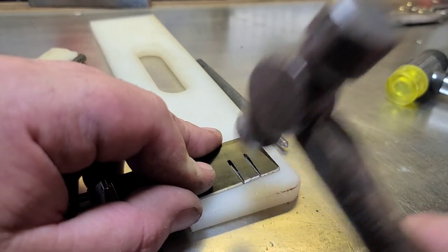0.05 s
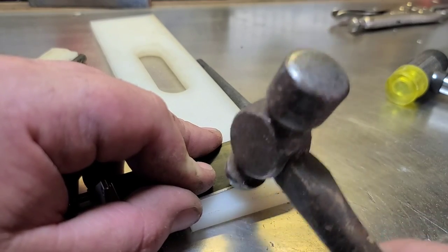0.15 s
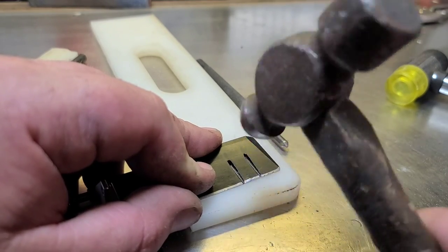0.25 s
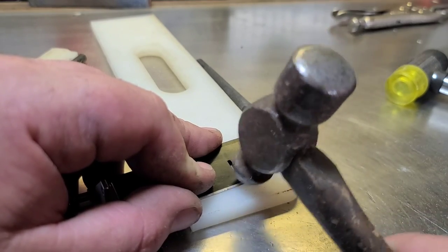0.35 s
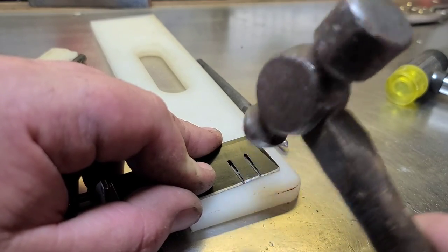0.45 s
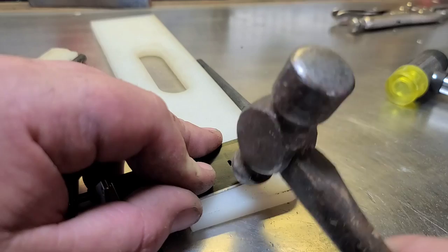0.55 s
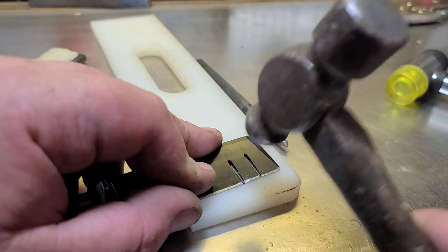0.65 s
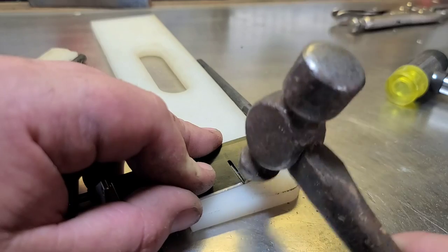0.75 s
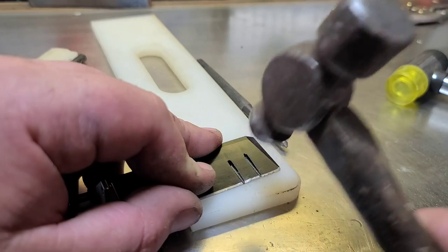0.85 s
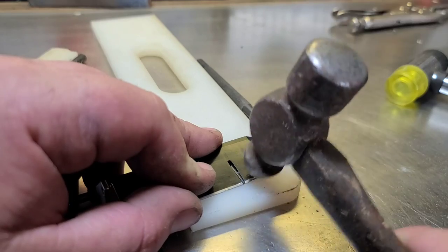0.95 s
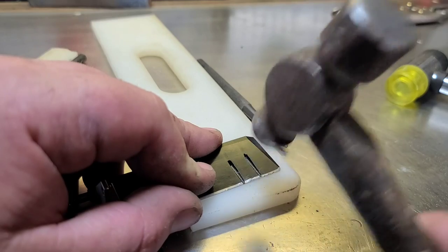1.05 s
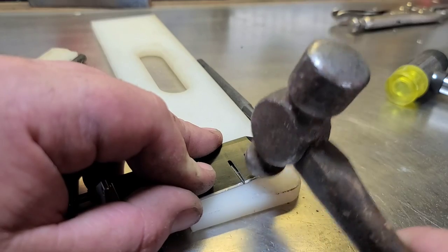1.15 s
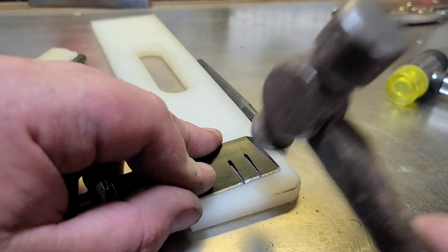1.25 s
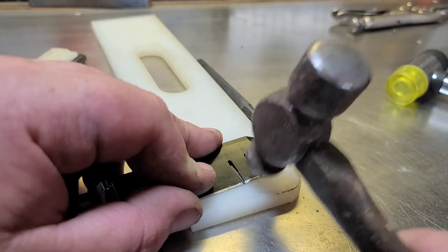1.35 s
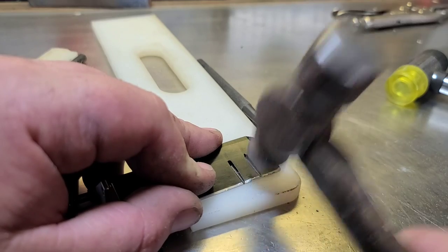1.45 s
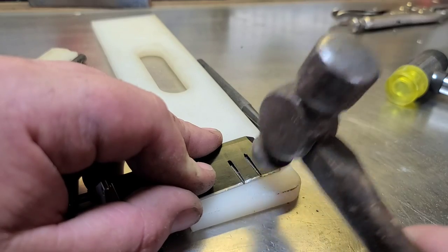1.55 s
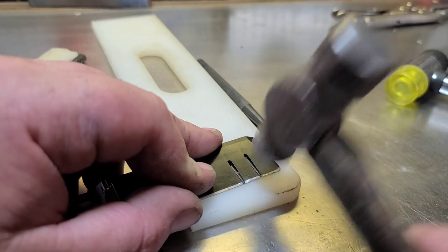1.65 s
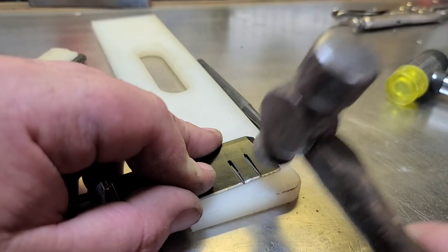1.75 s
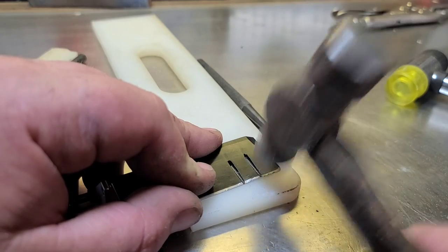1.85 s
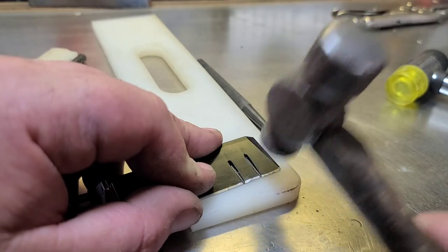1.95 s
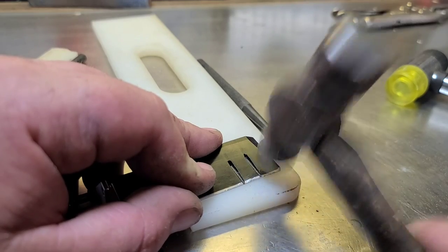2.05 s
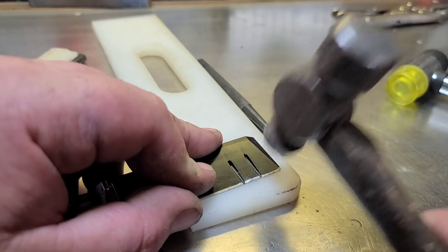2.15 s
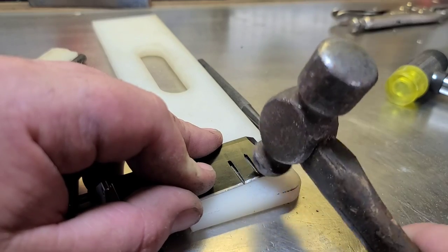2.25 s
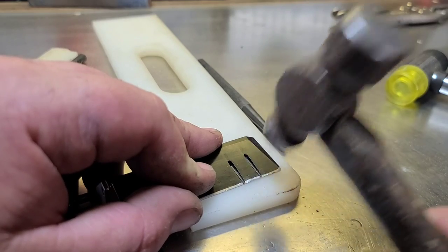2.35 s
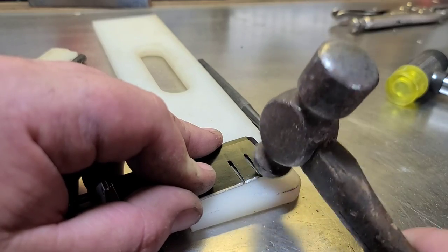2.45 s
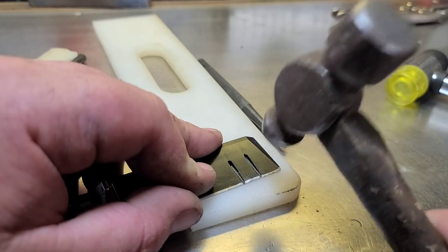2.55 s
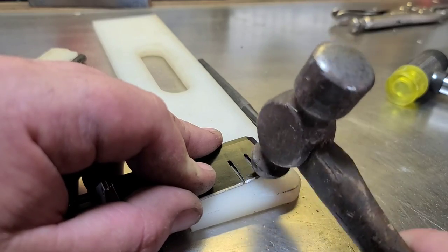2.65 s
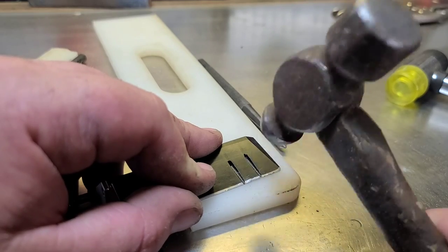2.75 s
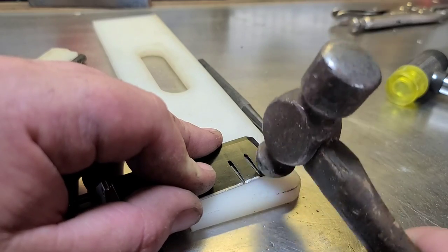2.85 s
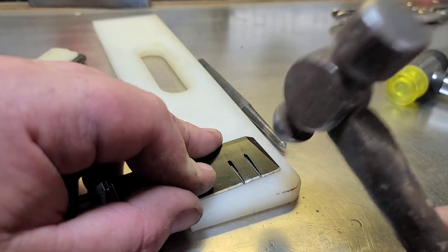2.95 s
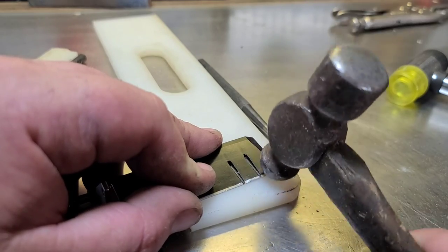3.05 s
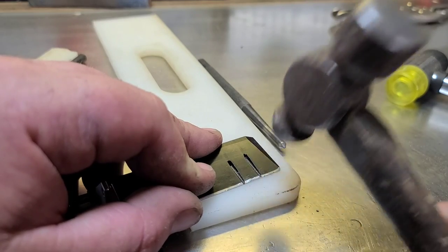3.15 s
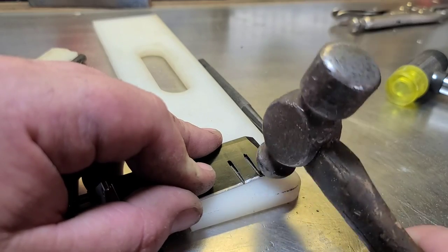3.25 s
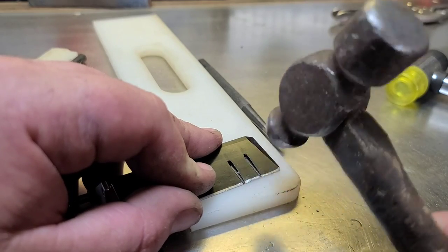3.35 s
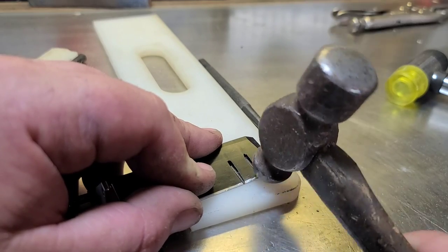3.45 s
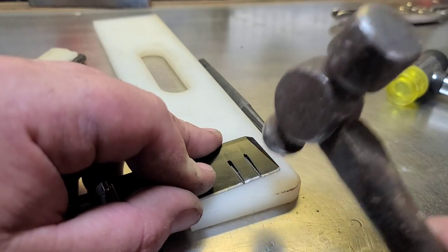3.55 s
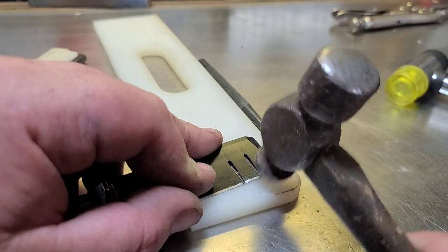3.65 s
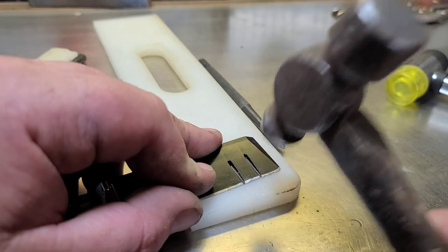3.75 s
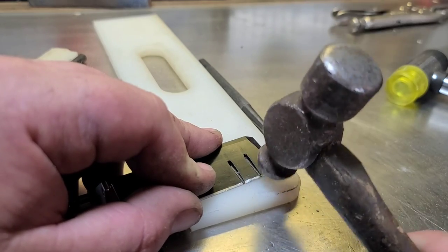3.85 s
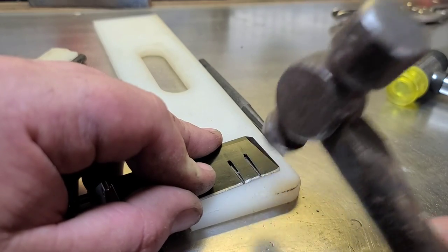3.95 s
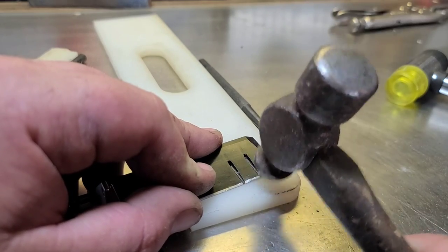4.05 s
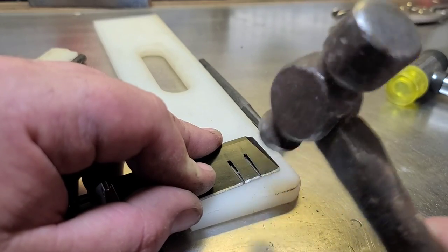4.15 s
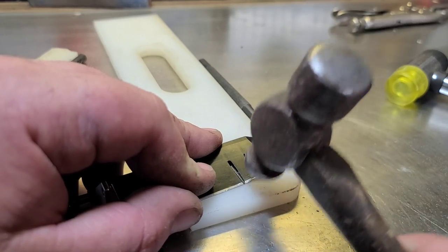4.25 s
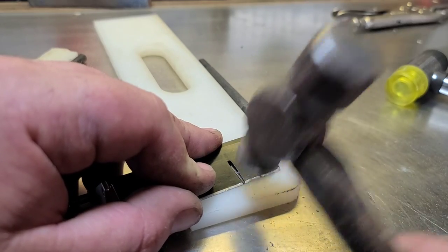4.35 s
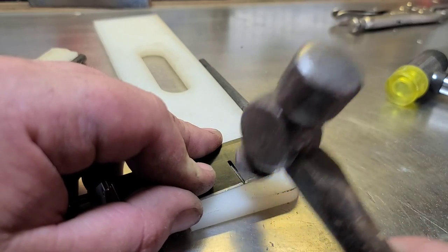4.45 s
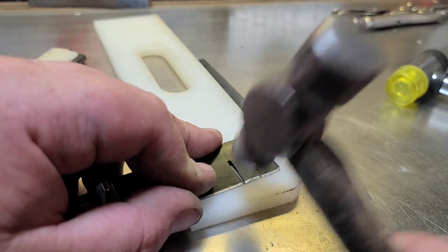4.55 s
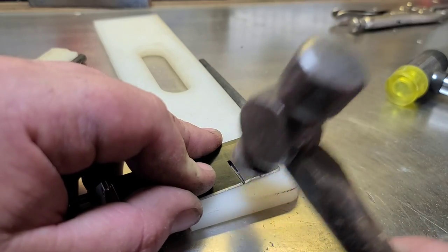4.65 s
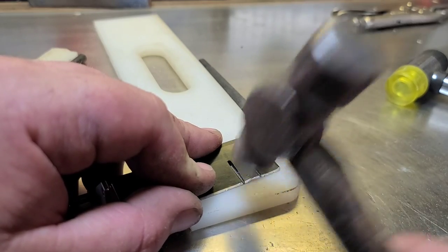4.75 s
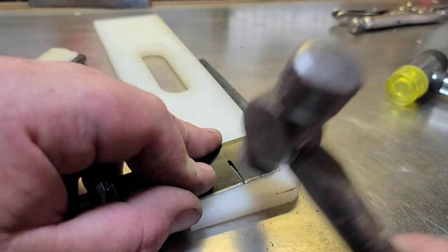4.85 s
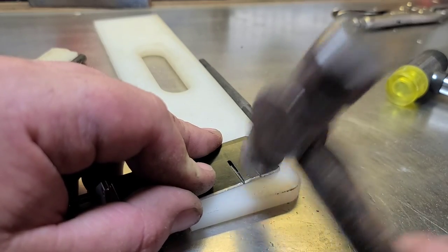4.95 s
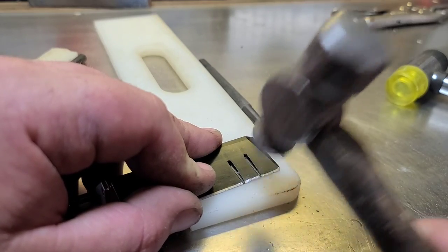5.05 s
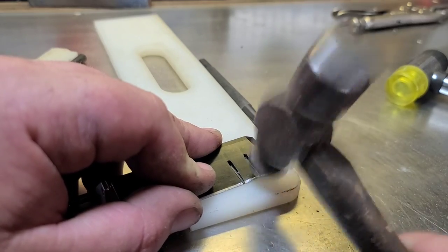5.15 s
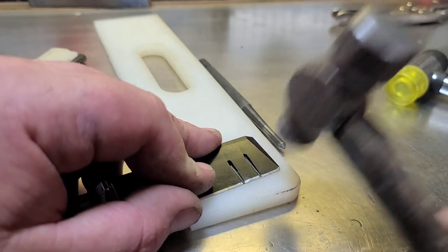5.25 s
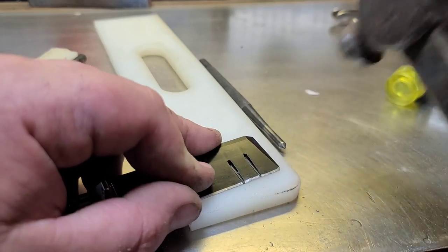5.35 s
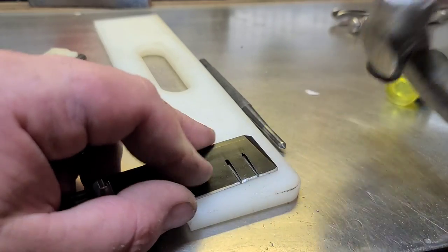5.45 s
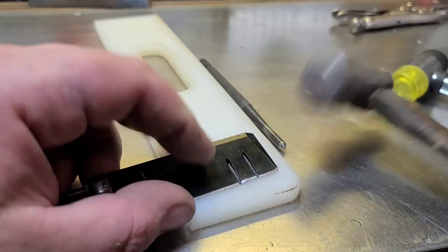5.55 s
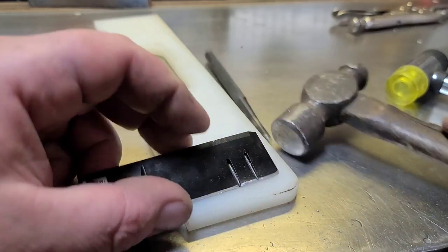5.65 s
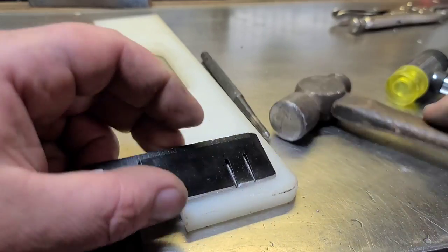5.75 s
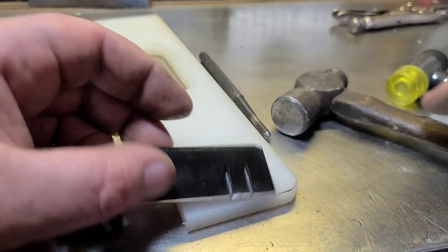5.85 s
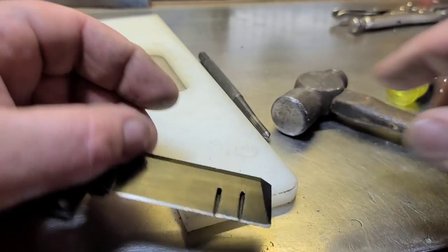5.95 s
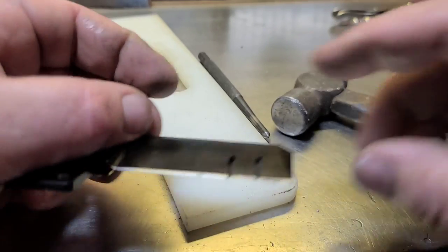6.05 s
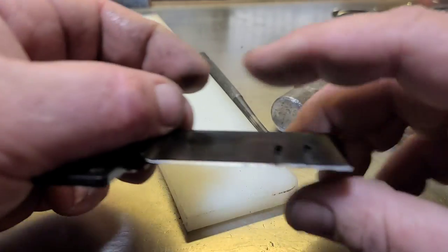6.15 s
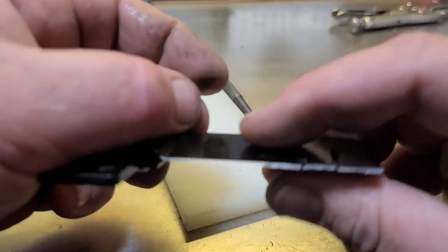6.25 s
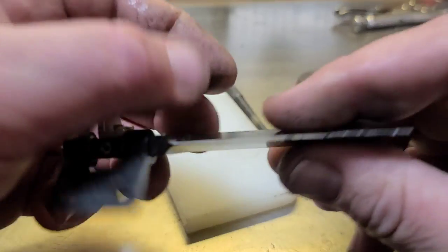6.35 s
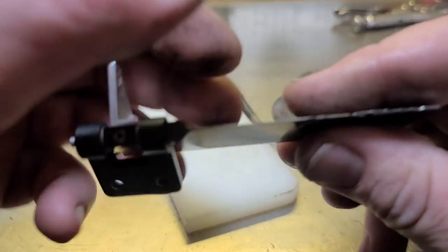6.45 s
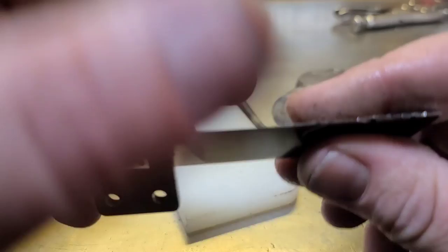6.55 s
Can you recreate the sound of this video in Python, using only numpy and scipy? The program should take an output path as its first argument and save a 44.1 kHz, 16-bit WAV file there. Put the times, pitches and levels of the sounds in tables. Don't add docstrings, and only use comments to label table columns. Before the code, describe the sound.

Steady quick hammering from the first instant: bright, clipped cracks on thin metal, each backed by a short woody slap of board against bench and brief small-room reflections. Blows vary slightly in brightness and force. The tapping stops, the hammer head drops on the metal bench, bounces with a thin high ring and settles, then the handle clacks down. A soft skin rub and a tick end it. Close stereo microphones, low steady noise floor.

```python
import sys
import numpy as np
from scipy import signal
from scipy.fft import rfft, irfft, next_fast_len
from scipy.io import wavfile

SR = 44100
rng = np.random.default_rng(int(sys.argv[2]) if len(sys.argv) > 2 else 0)


def elevation(decibels):
    levels = np.asarray(decibels, float)
    return 10 ** (levels / 20)


def int16_out(signal):
    q = np.round(np.clip(np.atleast_2d(signal).T, -1, 1) * 32767)
    wavfile.write(sys.argv[1], SR, q.astype(np.int16))


N = 290619
LEAD = 64

# (time [s], crack peak [dB], board level [dB], brightness above 6 kHz [dB])
TAPS = [(-.001, -15, -18, -13.5), (0.1979, -9.5, -17, -11.5), (0.403, -10.5, -17, -9),
        (0.5955, -11.5, -17, -9), (0.7911, -11, -16.5, -12), (0.9915, -11.5, -16.5, -10.5),
        (1.1867, -11.5, -16.5, -10.5), (1.3811, -11.5, -16.5, -9.5), (1.5769, -12.5, -16.5, -12.5),
        (1.7667, -13, -16.5, -9.5), (1.9612, -13, -15, -11), (2.1595, -11.5, -16.5, -12),
        (2.349, -10.5, -15.5, -11.5), (2.5465, -11.5, -16, -11.5), (2.7337, -12.5, -15.5, -10.5),
        (2.9254, -13, -14.5, -12.5), (3.1166, -13.5, -15, -16.5), (3.3109, -11.5, -15.5, -10.5),
        (3.5043, -11.5, -14.5, -10.5), (3.6971, -13.5, -15, -13.5), (3.8976, -12, -16, -10.5),
        (4.1001, -12, -16, -11), (4.2924, -12.5, -16, -8.5), (4.4786, -13, -17.5, -8),
        (4.6669, -10, -17.5, -10), (4.8637, -9.5, -16.5, -11.5), (5.0596, -10.5, -16, -11),
        (5.2505, -11.5, -15.5, -11.5)]
# (frequency [Hz], density [dB per Hz])
CRACK_COLOUR = [(350, -34), (600, -6), (1650, -10), (4310, -13), (4870, -7.5), (5660, -16), (8420, -15.5),
                (9140, -11.5), (14800, -16.5), (15800, -26)]
# (frequency [Hz], width [Hz], level [dB])
STRIP_MODES = [(1562, 70, -1.5), (2180, 43, -14.5), (2890, 300, 1), (3490, 220, -6.5), (3760, 200, 2),
               (7200, 28, -29), (8400, 210, -7), (9100, 190, -12), (8850, 330, -8), (10400, 27, -17),
               (12300, 220, -14), (11200, 140, -20), (12900, 40, -18.5), (14000, 35, -18.5)]
# (frequency [Hz], t60 [s], signed strength left [gain], right [gain])
BOARD_MODES = [(51, 0.6, -0.003, -0.003), (71, 0.423, 0.066, 0.067), (96, 0.1, -0.076, -0.093),
               (139, 0.234, 0.015, 0.02), (203, 0.26, 0.008, 0.006), (215, 0.208, -0.019, -0.017),
               (237, 0.13, 0.032, 0.06), (289, 0.165, 0.086, 0.107), (316, 0.085, -0.201, -0.307),
               (339, 0.165, -0.024, -0.008), (377, 0.119, -0.066, -0.07), (390, 0.2, -0.011, -0.016),
               (444, 0.133, 0.098, 0.091), (467, 0.14, -0.108, -0.168), (509, 0.18, -0.033, -0.062),
               (559, 0.045, -0.027, -0.039), (606, 0.188, -0.007, 0.009), (697, 0.313, -0.01, -0.027),
               (736, 0.02, -0.084, -0.092), (841, 0.233, -0.022, -0.02), (897, 0.033, -0.029, -0.096),
               (969, 0.131, -0.012, -0.0), (1075, 0.327, -0.008, -0.049), (1143, 0.062, -0.004, -0.022),
               (1198, 0.057, -0.052, 0.029), (121, .15, -.025, -.025), (163, .13, .012, .012)]
# (delay after blow [s], strength [gain])
SLAPS = [
    (0, 1),
    (.0052, 1.04),
    (.0105, .51),
]
# (frequency [Hz], near surfaces [dB], t60 [s], walls [dB], t60 [s])
ROOM = [(350, -39, 0.14, -28.5, 0.27), (650, -39, 0.18, -27.5, 0.22), (1410, -22, 0.11, -28.5, 0.22),
        (2940, -15.5, 0.02, -29.5, 0.19), (5340, -16.5, 0.017, -33.5, 0.17), (9050, -14, 0.044, -28, .2),
        (15400, -31.5, 0.1, -44, 0.19)]
# (frequency [Hz], density [dB per Hz])
FLOOR_COLOUR = [(12, -40), (20, -14), (58, -1), (125, -13), (200, -20), (300, -10), (500, -21), (800, -32),
                (950, -29), (1500, -36), (4000, -41), (7000, -45), (9700, -42), (15700, -50)]
# (time [s], peak [dB], brightness [dB], left minus right [dB], contact [s])
TICKS = [
    (5.459, -48, -14.5, -4, 0.002),
    (6.545, -28, -3.5, 0.5, 0.0028),
]
# (frequency [Hz], density [dB per Hz])
TICK_COLOUR = [(880, -42), (1500, -37), (2330, -3), (5470, -4.5), (5930, -7.5), (7180, -8.5),
               (15700, -17.5), (16500, -13.5)]
# (time [s], peak [dB], brightness [dB], left minus right [dB], contact [s])
HEAD = [
    (5.6835, -1, -27.5, -1, 0.0027),
    (5.7611, -19.5, -12.5, -6, 0.0026),
    (5.7649, -12, -22.5, 7.5, 0.003),
    (5.7934, -25.5, -8.5, -13, 0.0033),
    (5.83, -5.5, -18, -5.5, 0.0036),
]
# (frequency [Hz], density [dB per Hz])
HEAD_COLOUR = [(120, -53), (200, -22), (396, -3.5), (652, -11), (1070, -3.5), (2460, -4), (3050, 4.5),
               (4530, -2.5), (4880, -0.5), (15000, -23), (16500, -33.5)]
# (frequency [Hz], level [dB], t60 [s])
HEAD_MODES = [(10690, -24.5, 0.37), (10715, -41, 0.33), (5390, -47.5, .2), (3564, -40.5, .06)]
# (time [s], level [dB])
HEAD_STRUCK = [
    (5.692, -10),
    (5.767, 0),
]
# (time [s], level [dB])
THUDS = [
    (5.686, -33.5),
    (5.832, -28.5),
    (5.9425, -31),
    (5.960, -32),
]
# (time [s], peak [dB], brightness [dB], left minus right [dB], contact [s])
HANDLE = [
    (5.942, -16.5, -26, -6, 0.0065),
    (5.959, -14, -17.5, 8.5, 0.0034),
    (5.982, -21, -22, -4.5, 0.005),
]
# (frequency [Hz], density [dB per Hz])
HANDLE_COLOUR = [(59, -39.5), (100, -5), (267, -5.5), (401, -4), (829, -20), (1050, -0.5), (1300, -11.5),
                 (3180, -4), (11700, -32.5), (15100, -35.5), (16500, -63.5)]
# (time [s], level [dB])
RUB = [
    (6.079, -78),
    (6.198, -87.5),
    (6.301, -64.5),
    (6.4, -60),
    (6.5, -56.5),
    (6.59, -59),
]
# (frequency [Hz], density [dB per Hz])
RUB_COLOUR = [(880, -31.5), (1500, -3.5), (1830, -2.5), (2040, 4), (2440, -8), (3310, -3), (4040, -3),
              (7610, -18), (10800, -2.5), (13400, -24), (14900, -5), (16000, -5.5)]
# (frequency [Hz], left minus right [dB])
PORT_BALANCE = [(60, -3), (110, 5), (200, 2.5), (380, -7), (700, -4), (1290, -9), (2380, -10.5),
                (4400, 3.5), (8120, 7.5), (15000, 12.5)]
# (frequency [Hz], level re sound [dB])
SMEAR = [(200, -24.5), (1000, -11.5), (4000, -12), (12000, -12.5)]


def colour(x, points, share=1):
    hz, db = np.transpose(points)
    grid_hz = np.maximum(np.fft.rfftfreq(2048, 1 / SR), 1)
    gain = elevation(np.interp(np.log(grid_hz), np.log(hz), db))
    ceps = irfft(share * np.log(gain))
    ceps[1:1024] *= 2
    ceps[1025:] = 0
    return signal.fftconvolve(x, irfft(np.exp(rfft(ceps))))[:len(x)]


def fade(t, t60_s):
    return np.exp(-np.log(1000) * t / t60_s)


def add(track, s, sound):
    i = int(round(s * SR)) + LEAD
    track[..., i:i + sound.shape[-1]] += sound[..., :track.shape[-1] - i]


def knocks(rows, points, gain_db, rattle_db, rattle_s, spike_db=-18.0, late_s=.0004):
    out, t = np.zeros((3, N + LEAD)), np.arange(8192) / SR
    usual_db = np.mean([row[2] for row in rows])
    for s, peak_db, bright_db, pan_db, contact_s in rows:
        envelope = np.exp(-t / contact_s) + elevation(rattle_db) * np.exp(-t / rattle_s)
        grit = rng.standard_normal(len(t)) * elevation(3.0 * rng.standard_normal(len(t)))
        grit *= np.minimum(t / 0.0008, 1) * envelope
        touch = (t == 0) + .2 * rng.standard_normal(len(t)) * np.exp(-t / .00015)
        tilt = [(4000, 0.015), (8000, bright_db - usual_db)]
        burst, push = (colour(colour(x, points), tilt) for x in (grit, touch))
        burst, push = (x * np.sqrt(contact_s * SR / np.sum(x ** 2)) for x in (burst, push))
        burst = burst - elevation(spike_db) * push
        sound = np.array([burst * elevation(pan_db / 2), burst / elevation(pan_db / 2), push])
        add(out, s + late_s, sound * elevation(peak_db + gain_db))
    return out


def crack_and_strip():
    pan_db, crack_contact_s, slap_contact_s = -1.1, .0018, .0029
    blows = [(s, db, bright, pan_db, crack_contact_s) for s, db, _, bright in TAPS]
    crack = knocks(blows, CRACK_COLOUR, gain_db=-2.0, rattle_db=-21.0, rattle_s=0.005)
    slaps = [(s + SLAPS[1][0], db, bright, pan, slap_contact_s) for s, db, bright, pan, _ in blows]
    dull = CRACK_COLOUR[:6] + [(9000, -24.5)]
    crack += knocks(slaps, dull, gain_db=-9.5, rattle_db=-8.0, rattle_s=0.028)
    for hz, width_hz, db in STRIP_MODES:
        b, a = signal.iirpeak(hz, hz / width_hz, SR)
        to_room = hz < 5000
        crack = crack + elevation(db) * signal.lfilter(b, a, crack) * [[1], [1], [to_room]]
    return crack


def board(rows, scatter_db=1.2, seat_db_per_oct=0):
    gain_db, longest_ring_periods, seat_pivot_hz, uneven_hz = 18.5, 115., 330, 900
    hz, t60_s, left, right = np.transpose(BOARD_MODES)
    t = np.arange(-32, 16000)[:, None] / SR
    onset = (1 + np.tanh(t / .0004)) / 2
    held_t60_s = np.minimum(t60_s, longest_ring_periods / hz)
    modes = np.cos(2 * np.pi * hz * t) * fade(np.maximum(t, 0), held_t60_s) * onset
    out = np.zeros((2, N + LEAD))
    chance = rng.standard_normal((len(rows), 2 * len(hz) + len(SLAPS)))
    usual_db = np.mean([row[1] for row in rows])
    for (s, db), luck in zip(rows, chance):
        drive_db = db + seat_db_per_oct * (db - usual_db) * np.log2(hz / seat_pivot_hz)
        uneven_db = scatter_db * (1 + hz / uneven_hz) * luck[len(SLAPS):].reshape(2, -1)
        ring = (np.array([left, right]) * elevation(drive_db + gain_db + uneven_db)) @ modes.T
        for (delay_s, strength), wobble in zip(SLAPS, luck):
            add(out, s + .0001 + delay_s * (1 + .008 * wobble), strength * ring)
    return out


def answer():
    t = np.arange(SR // 2) / SR
    octave = np.log2(np.maximum(np.fft.rfftfreq(len(t), 1 / SR), 1))
    noise, out = rfft(rng.standard_normal((2, len(t)))), 0
    centres = np.log2([row[0] for row in ROOM])
    for k, (_, near_db, near_t60_s, wall_db, wall_t60_s) in enumerate(ROOM):
        band = irfft(noise * np.interp(octave, centres, np.arange(len(ROOM)) == k), len(t))
        near = elevation(near_db) * fade(t, near_t60_s)
        walls = elevation(wall_db) * fade(t, wall_t60_s)
        out = out + band * np.hypot(near, walls)
    return out * np.minimum(t / 0.0002, 1)


def workshop(x, count=3):
    x = x.mean(axis=0)
    time, knots = np.arange(len(x)), np.arange(0, len(x) + SR, SR // 5)
    share = np.array([np.interp(time, knots, rng.standard_normal(len(knots))) for _ in range(count)])
    share /= np.sqrt(np.sum(share ** 2, axis=0))
    return sum(signal.fftconvolve((w * x)[None], answer(), axes=1)[:, :len(x)] for w in share)


def hiss(points, alike_hz, flicker_db):
    mid, side = (colour(rng.standard_normal(N), points) for _ in range(2))
    side = signal.lfilter(*signal.butter(1, alike_hz, "high", fs=SR), side)
    knots = np.arange(0, N, 2000)
    flicker = np.interp(np.arange(N), knots, rng.standard_normal(len(knots)))
    rms = np.sqrt(np.var(mid) + np.var(side))
    return np.array([mid + side, mid - side]) / rms * elevation(flicker_db * flicker)


def noise_floor():
    return elevation(-51) * hiss(FLOOR_COLOUR, 600, 0.96)


def strip_ticks():
    ticks = knocks(TICKS, TICK_COLOUR, gain_db=-1.0, rattle_db=-30.5, rattle_s=0.0088)
    return ticks * [[1], [1], [.3]]


def head_contacts():
    return knocks(HEAD, HEAD_COLOUR, gain_db=-7.0, rattle_db=-16.5, rattle_s=0.04, spike_db=-9.5,
                  late_s=0.0024)


def head_ring():
    rests_s, damped_t60_s, rise_s = 5.826, .03, .003
    out, t = np.zeros(N + LEAD), np.arange(SR // 4) / SR
    for s, blow_db in HEAD_STRUCK:
        ring = sum(elevation(db + blow_db) * np.sin(2 * np.pi * hz * (s + t)) * fade(t, t60_s)
                   for hz, db, t60_s in HEAD_MODES)
        damping = fade(np.maximum(s + t - rests_s, 0), damped_t60_s)
        add(out, s, ring * np.minimum(t / rise_s, 1) * damping)
    return out


def handle_contacts():
    return knocks(HANDLE, HANDLE_COLOUR, gain_db=-7.0, rattle_db=-24.0, rattle_s=0.01)


def finger_rub():
    s, rub_db = np.transpose(RUB)
    envelope_db = np.interp(np.arange(N) / SR, s, rub_db, left=-120)
    return hiss(RUB_COLOUR, 500, 2.) * elevation(envelope_db)


def ports(pair):
    lag_samples = 7
    size = next_fast_len(pair.shape[1])
    hz = np.fft.rfftfreq(size, 1 / SR)
    points_hz, balance_db = np.transpose(PORT_BALANCE)
    tilt = elevation(np.interp(np.log(hz + 1), np.log(points_hz), balance_db) / 2)
    lag = np.exp(-2j * np.pi * np.minimum(hz * lag_samples / SR, 1))
    return irfft(rfft(pair, size) * [tilt, lag / tilt], size)[:, :pair.shape[1]]


def smear(x):
    block_samples, patch_bins, patch_db, right_db = 1536, 24, 6.5, -9
    overlap_samples = block_samples * 3 // 4
    hz, _, block = signal.stft(x, SR, "hann", block_samples, overlap_samples)
    patch = rng.standard_normal((hz.size // patch_bins + 1, block.shape[2]))
    patch = np.repeat(patch, patch_bins, axis=0)[:hz.size]
    points_hz, points_db = np.transpose(SMEAR)
    gain_db = np.interp(np.log(hz + 1), np.log(points_hz), points_db)[:, None] + patch_db * patch
    phase = np.exp(2j * np.pi * rng.random(block.shape[1:]))
    noise = np.abs(block) * elevation(gain_db) * phase
    noise = signal.istft(noise, SR, "hann", block_samples, overlap_samples)[1][:, :N]
    return noise * elevation([[0], [right_db]])


def scene():
    sharp = crack_and_strip()
    body = board([(row[0], row[2]) for row in TAPS], seat_db_per_oct=0.76)
    sharp += strip_ticks() + head_contacts() + head_ring() + handle_contacts()
    body += board(THUDS, scatter_db=2.0)
    upper = signal.sosfilt(signal.butter(2, 600, "high", fs=SR, output="sos"), body)
    near = ports(sharp[:2]) + body + workshop(sharp[2] + elevation(-9.5) * upper)
    return near[:, LEAD:] + finger_rub() + noise_floor()


def top_cut(x):
    return signal.sosfilt(signal.butter(12, 16800, fs=SR, output="sos"), x)


def record(dry):
    rounded = np.tanh(0.77 * dry) / 0.95
    x = signal.sosfilt(signal.ellip(8, .2, 60, 16100, fs=SR, output="sos"), rounded)
    return top_cut(x + smear(x))


dry = scene()
out = record(dry)
int16_out(out)
```